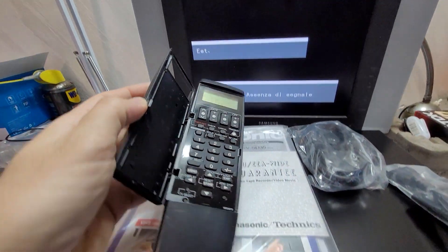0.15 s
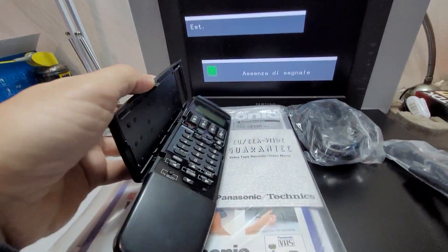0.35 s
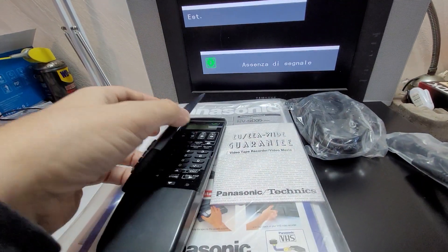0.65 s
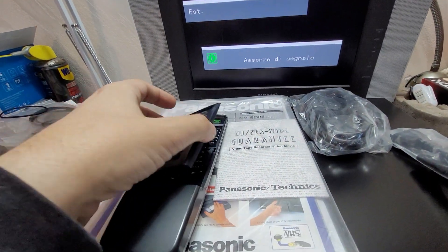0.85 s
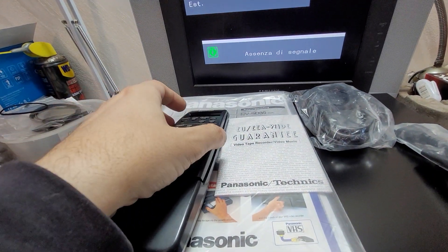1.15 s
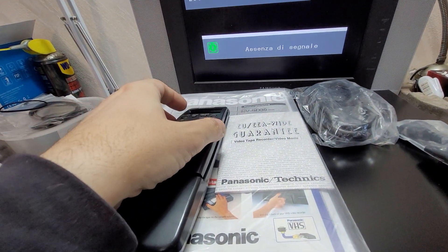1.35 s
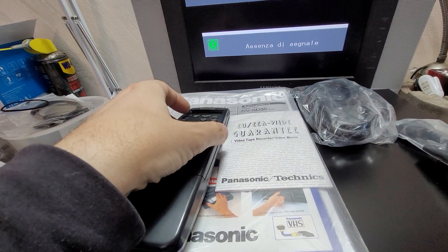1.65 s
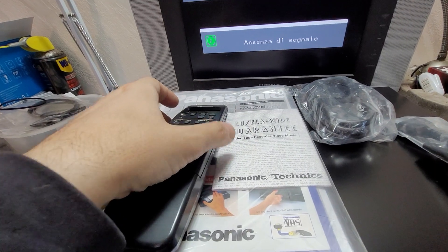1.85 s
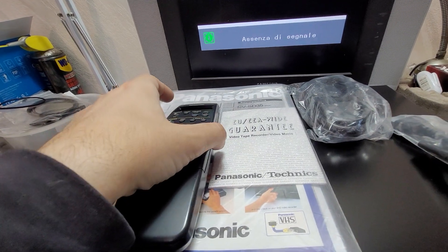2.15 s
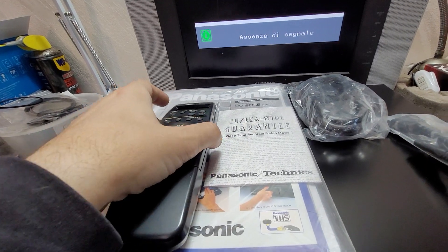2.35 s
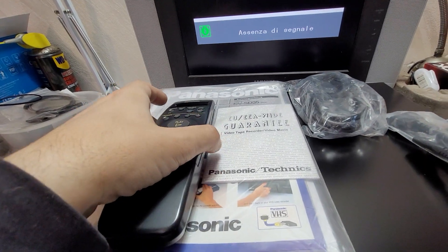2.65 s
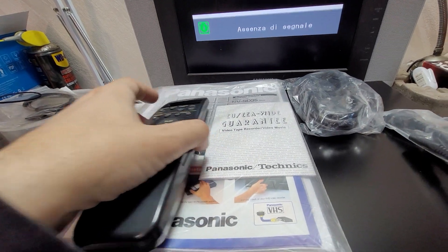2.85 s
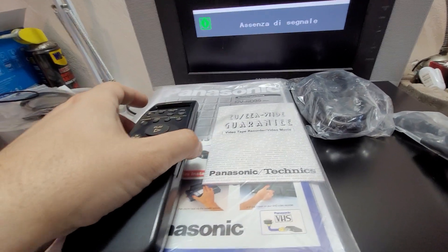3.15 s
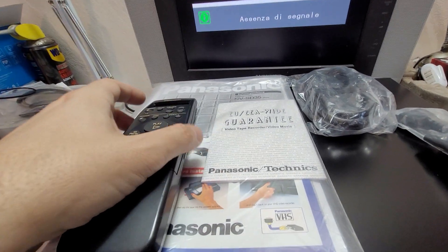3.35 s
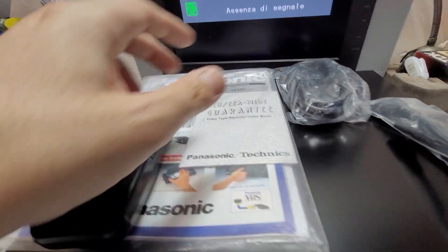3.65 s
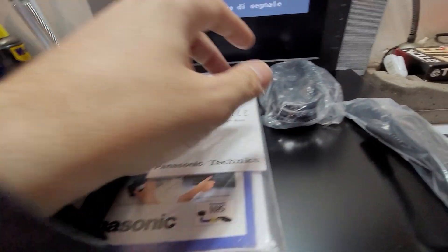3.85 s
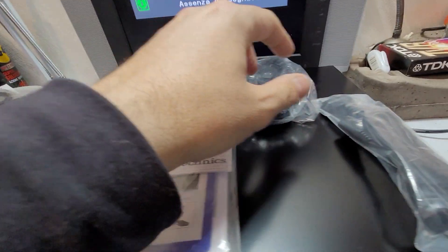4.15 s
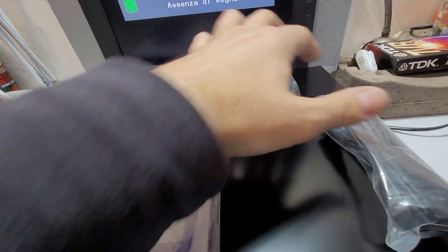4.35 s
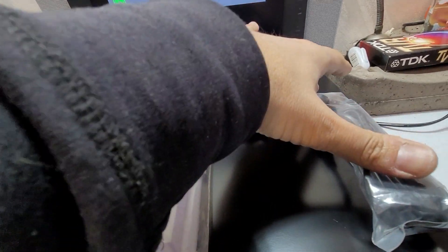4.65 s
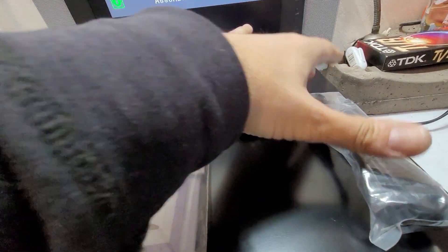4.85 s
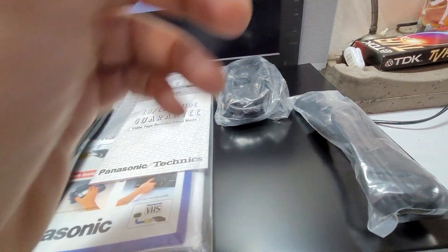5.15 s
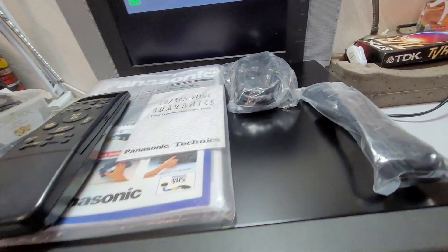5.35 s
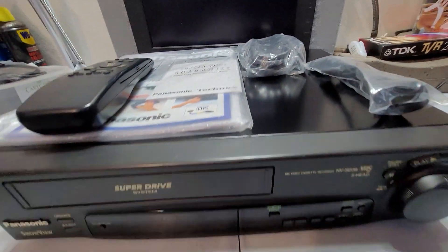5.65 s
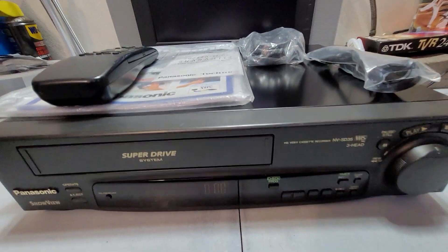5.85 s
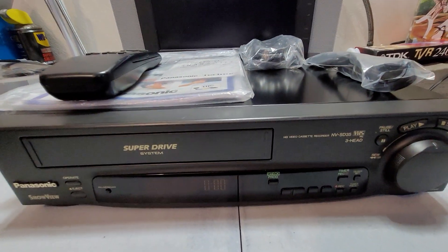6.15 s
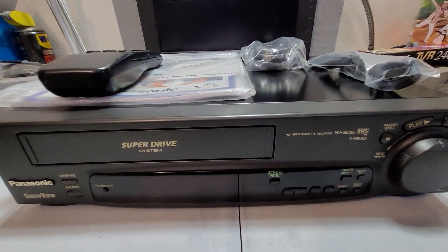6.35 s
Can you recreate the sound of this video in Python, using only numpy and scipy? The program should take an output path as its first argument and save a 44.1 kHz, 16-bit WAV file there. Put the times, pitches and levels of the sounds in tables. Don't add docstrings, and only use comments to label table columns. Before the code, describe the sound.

In a quiet small room with faint mains hum, a plastic remote's hinge creaks in quick slips. Cloth brushes and small ticks follow, then the lid bumps, ratchets down and snaps shut loudly, booming in the hollow desk. Later a thin bag crackles briefly. At the end a finger pops and rubs against the right port of the handheld phone.

```python
import sys
import numpy as np
from scipy import signal
from scipy.fft import rfft, irfft
from scipy.io import wavfile
from scipy.ndimage import uniform_filter1d

SR = 44100
rng = np.random.default_rng(int(sys.argv[2]) if len(sys.argv) > 2 else 0)


def attenuation_scalar(level_db):
    decades = np.asarray(level_db, float) / 20
    return 10 ** decades


def persist_wave(psi):
    counts = np.round(np.clip(psi, -1, 1) * 32767).astype(np.int16)
    wavfile.write(sys.argv[1], SR, np.atleast_2d(counts).T)


N = 287525
T = np.arange(N) / SR


def colour(x, points):
    size = 8192
    hz, db = np.transpose(points)
    grid_hz = np.arange(size // 2 + 1) * SR / size
    gain_db = np.interp(np.log(grid_hz + 1), np.log(hz), db)
    cep = irfft(gain_db * np.log(10) / 20)
    cep[1:size // 2] *= 2
    cep[size // 2 + 1:] = 0
    impulse = irfft(np.exp(rfft(cep)))
    return signal.oaconvolve(x, impulse[None], axes=-1)[:, :x.shape[1]]


def unit(x):
    return x / np.sqrt(np.mean(x ** 2))


def walk(rate_hz):
    hold = int(SR / rate_hz)
    steps = np.repeat(rng.standard_normal(N // hold + 1), hold)
    return 1.7 * uniform_filter1d(uniform_filter1d(steps, hold), hold)[:N]


def add(out, s, sound):
    i = int(s * SR)
    out[:, i:i + sound.shape[1]] += sound[:, :N - i]


def swells(rows, edge=3.):
    s, half, *db = np.transpose(rows)[:, :, None]
    coarse_t = T[::32]
    shape = np.exp(-np.abs((coarse_t - s) / half) ** edge)
    gains = [np.sqrt(np.sum((attenuation_scalar(d) * shape) ** 2, axis=0)) for d in db]
    return [np.interp(T, coarse_t, g) for g in gains]


def diffuse(x):
    ports_alike_hz = 604
    side = signal.lfilter(*signal.butter(2, ports_alike_hz, "high", fs=SR), x[1])
    return x[0] + side * np.array([[1], [-1]])


def ring(modes, t, scatter_db, turn):
    hz, db, t60 = np.transpose(modes)[:, :, None]
    level, phase = rng.standard_normal((2, 2, len(modes), 1))
    shape = (1 - np.exp(-1.5 * hz * t)) * 1000. ** (-t / t60)
    tones = np.sin(2 * np.pi * hz * t + turn * phase)
    y = (attenuation_scalar(db + scatter_db * level) * tones * shape).sum(axis=1)
    return y / np.abs(y).max()


# (from [Hz], to [Hz], level [dB], t60 [s])
ECHO_BANDS = [(0, 1500, -41, 0.25), (1520, 4000, -45.5, 0.38), (4000, 9600, -46.5, 0.43),
              (8300, 22050, -42, 0.26)]


def echo(sound, blur_hz):
    t = np.arange(2 ** 14) / SR
    hz = np.arange(len(t) // 2 + 1) * SR / len(t)
    power = np.mean(np.abs(rfft(sound, len(t))) ** 2, axis=0)
    smooth = np.sqrt(uniform_filter1d(power, int(blur_hz * len(t) / SR)).clip(0))
    noise = smooth * rfft(diffuse(rng.standard_normal((2, len(t)))))
    tail = 0
    for lo, hi, db, t60 in ECHO_BANDS:
        band = irfft(noise * (hz >= lo) * (hz < hi))
        tail = tail + attenuation_scalar(db) * band * 1000. ** (-t / t60)
    return tail * (1 - np.exp(-(t / 0.0031) ** 2))


# (frequency [Hz], level [dB])
TOP_MODES = [(9000, -3), (10200, 6.5), (11500, 4), (13000, -6), (14000, 1.5), (15000, -2), (15900, -0.5)]


def knocks(events, low, high, high_t60_s, pan_db, grip_db, dull_db=9.5, top=TOP_MODES):
    out, t = np.zeros((2, N)), np.arange(SR // 16) / SR
    top_t60_s = .002
    pan = attenuation_scalar(np.array([[.5], [-.5]]) * pan_db)
    for s, db, high_db, top_db, rattle_ms, free_hz in events:
        u = t * 2000 / max(rattle_ms, .2)
        contacts = rng.standard_normal(len(t)) * np.minimum(u * 6, 1) * np.exp(-u)
        contacts[2] += 2.5
        bins = rfft(contacts)
        flat = bins / (np.abs(bins) + 1e-9) ** .8
        contacts = irfft(flat, len(t)) * np.exp(-u / 4)

        low_free_hz, high_free_hz = min(free_hz, 1500), max(free_hz, 2600)
        low_set = [(hz, g - grip_db * np.log2(hz / low_free_hz) ** 2, t60) for hz, g, t60 in low]
        high_set = [(hz, g - dull_db * np.log2(hz / high_free_hz) ** 2, high_t60_s) for hz, g in high]
        top_set = [(hz, g, top_t60_s) for hz, g in top]
        sound = np.zeros((2, len(t)))
        for modes, turn, gain_db in ((low_set, .4, 0), (high_set, 1.1, high_db + 3.5),
                                     (top_set, 1.3, top_db + 16.5)):
            struck = ring(modes, t, 1.5, turn)
            part = signal.fftconvolve(contacts[None], struck)[:, :len(t)]
            sound += attenuation_scalar(db + gain_db) * part / np.abs(part).max()
        add(out, s + 0.00069, sound * pan)
        add(out, s, echo(sound, blur_hz=900))
    return out


def squeaks(rows, ports_db):
    out, t = np.zeros((2, N)), np.arange(-SR // 6, SR // 6) / SR
    for s, half, hz, width_hz, db in rows:
        noise = rng.standard_normal((2, 2, len(t)))
        wander = signal.lfilter(*signal.butter(2, width_hz / 2, fs=SR), noise)
        tone = unit(wander[0] * np.cos(2 * np.pi * hz * t) + wander[1] * np.sin(2 * np.pi * hz * t))
        tone[1] = 0.26 * tone[0] + 2.0 * tone[1]
        stroke = np.exp(-np.abs(t / half) ** 1.5)
        add(out, s + t[0], attenuation_scalar(db + np.array(ports_db)[:, None]) * tone * stroke)
    return out


# (multiple of 100.3 Hz [1], level [dB])
HUM_TONES = [(1, 0), (1.5, -16.5), (2, -14.5), (3, -14)]
# (time [s], level [dB])
HUM_LEVEL = [(0, -51), (.15, -52.5), (1.1, -53), (1.9, -54), (2.3, -53), (2.9, -52), (3.35, -52),
             (3.9, -50.5), (4.7, -53), (5.1, -55.5), (5.5, -51), (5.7, -57), (6.52, -55.5)]
# (centre [s], half length [s], level [dB])
STIRS = [(.38, 0.27, -52.5), (1.03, 0.12, -53.5), (1.47, 0.22, -50.5), (2.22, 0.17, -58),
         (2.9, 0.19, -51.5), (3.45, 0.15, -54.5), (3.8, 0.2, -53), (5.5, 0.19, -55.5), (5.95, .08, -58),
         (6.42, 0.03, -56)]
# (frequency [Hz], density [dB per Hz])
AIR = [(20, -15.5), (40, -1.5), (130, 0), (240, -0.5), (500, -13), (1000, -18.5), (1500, -27), (2500, -28),
       (8000, -33.5), (16000, -38.5)]


def room():
    hum_db = np.interp(T, *np.transpose(HUM_LEVEL)) + 0.51 * walk(3.9)
    hum = np.zeros(N)
    for multiple, db in HUM_TONES:
        flicker_db = 2.4 * walk(20)
        cycles = 100.3 * multiple * T + 0.007 * walk(17)
        hum += attenuation_scalar(db + flicker_db) * np.sin(2 * np.pi * cycles)
    mode_rest_db = -73.5
    stir = swells(STIRS, edge=1.9)[0] + attenuation_scalar(mode_rest_db)
    mode = np.sin(2 * np.pi * (56 * T + 0.57 * walk(0.7)))
    air_db = -57 + 0.5 * (T > 5.5) + 1.1 * walk(4)
    air = unit(colour(diffuse(rng.standard_normal((2, N))), AIR))
    return attenuation_scalar(hum_db + 2.5) * hum + stir * attenuation_scalar(4.5 + 1.5 * walk(9.6)) * mode + attenuation_scalar(air_db + 1.5) * air


# (centre [s], half length [s], coarse rustle [dB], fine rustle [dB])
CLOTH_STROKES = [(0.085, 0.043, -62, -79), (0.23, 0.07, -65.5, -76), (0.36, 0.057, -63, -77),
                 (0.443, 0.015, -59, -72), (0.564, 0.06, -63.5, -80), (0.646, 0.049, -67.5, -78),
                 (0.998, 0.076, -65, -88), (1.215, 0.069, -71, -99), (1.84, 0.14, -76, -83),
                 (2.051, 0.047, -67.5, -77.5), (2.408, .1, -68.5, -79), (2.684, 0.081, -69, -77),
                 (2.93, 0.09, -70.5, -68), (3.153, 0.075, -73, -95), (3.384, 0.048, -67, -69.5),
                 (3.426, 0.022, -66, -60.5), (3.67, 0.12, -65.5, -78.5), (4.157, 0.24, -70.5, -81.5),
                 (4.565, 0.043, -63.5, -66.5), (4.69, 0.076, -58.5, -83), (4.851, 0.014, -54, -89),
                 (5.003, 0.029, -93, -88), (5.341, 0.068, -69, -82), (5.51, 0.058, -65.5, -67)]
# (frequency [Hz], density [dB per Hz])
CLOTH_COARSE = [(1500, -20), (2500, -11), (3000, 0.5), (3600, -2), (4700, -1.5), (7000, -4.5), (9000, -13)]
# (frequency [Hz], density [dB per Hz])
CLOTH_FINE = [(3500, -16), (4400, -6), (4800, 1), (5400, -7), (6500, -14.5), (10500, 3), (13000, -3),
              (16000, -4)]


def cloth():
    coarse, fine = swells(CLOTH_STROKES, edge=1.4)
    coarse_rest_db, fine_rest_db = -74, -93
    coarse, fine = coarse + attenuation_scalar(coarse_rest_db), fine + attenuation_scalar(fine_rest_db)
    bursts_db = 1.7 * rng.standard_exponential((2, 1, N)).clip(max=6)
    grains = rng.standard_normal((2, 2, N)) * attenuation_scalar(bursts_db)
    fine = fine * attenuation_scalar(13.5 + 1.6 * walk(49)) * unit(colour(grains[0], CLOTH_FINE))
    return fine + coarse * attenuation_scalar(4.0 + 1.4 * walk(60)) * unit(colour(grains[1], CLOTH_COARSE))


# (time [s], low peak [dB], high [dB re low], top [dB re low], freest region [Hz])
CASE_TICKS = [(0.049, -47, 11.5, 2.5, 786), (0.382, -63, 5, 2, 6560), (0.392, -46.5, 4.5, -2.5, 708),
              (0.446, -50, -6, -24, 990), (0.679, -47.5, 9, -2, 3830), (0.787, -48, 11.5, -10, 5650),
              (0.818, -47, -29, -49, 1350), (1.813, -50, 6, -12, 2890), (2.004, -50, -5, -31.5, 1020),
              (1.737, -45, -6, -26, 1190), (1.787, -52, -9, -30, 1300), (1.801, -58, -2, -30, 1400),
              (2.232, -53.5, 2, -9, 3590), (2.286, -56, 1.5, -19, 1014), (2.304, -50.5, 5, -11.5, 4940),
              (2.372, -37.5, -6, -40, 1900), (2.438, -45.5, -0.5, -30, 5050), (2.75, -54.5, 3, -24, 904),
              (2.969, -48.5, 5, -18, 4000), (3.26, -60.5, 0, -29, 1660), (3.339, -51.5, -2, -27, 2600),
              (3.43, -59, 8, -8, 4760), (5.313, -41.5, -0.5, -29, 2610), (5.475, -48, 7.5, -3, 6400)]
# (frequency [Hz], level [dB], t60 [s])
CASE_LOW = [(740, -6, 0.024), (1035, 3.5, 0.011), (1305, -3, 0.014), (1550, 4.5, 0.0082),
            (1760, -1.5, 0.012), (2010, -1, 0.011)]
# (frequency [Hz], level [dB])
CASE_HIGH = [(2690, -2), (3050, -13), (3390, -1), (3990, -1), (4320, -2.5), (4800, -3.5), (5400, -1.5),
             (5900, -3), (6430, -10), (7310, -8.5)]


def case_ticks():
    rattle_ms = 4.2
    events = [(*tick, rattle_ms, free_hz) for *tick, free_hz in CASE_TICKS]
    return knocks(events, CASE_LOW, CASE_HIGH, .007, pan_db=-2.0, grip_db=6.5, dull_db=1.5)


# (time [s], low peak [dB], high [dB re low])
HINGE_SLIPS = [
    (0.0688, -33.5, -4.5),
    (.081, -34.5, -6),
    (.094, -36.5, -6),
    (.110, -37.5, -6.5),
    (.355, -41.5, -31),
    (.363, -43.5, -12),
]
# (frequency [Hz], level [dB], t60 [s])
HINGE_LOW = [(800, 9.5, 0.039), (851, 6.5, 0.037), (1350, 3, 0.017), (1630, -3, 0.015)]
# (frequency [Hz], level [dB])
HINGE_HIGH = [(2640, -10), (3080, -10), (3600, -11), (4200, -1), (4540, -3), (5000, -5), (5500, -8),
              (6060, -8), (6590, -7.5)]


def hinge():
    top_db, rattle_ms, free_hz = -40, 7.4, 4200
    events = [(*e, top_db, rattle_ms, free_hz) for e in HINGE_SLIPS]
    return knocks(events, HINGE_LOW, HINGE_HIGH, 0.016, pan_db=-2.5, grip_db=8)


# (time [s], peak [dB], deep panel [dB re upper panels])
DESK_BLOWS = [
    (0.499, -59, 18),
    (1.027, -40.5, 3),
    (1.5775, -20, 2.5),
    (1.623, -39.5, -15.5),
    (4.133, -54.5, 12),
    (4.847, -39, -3),
]
# (frequency [Hz], level [dB], t60 [s])
DESK_DEEP = [(55, -5, .2), (68, -3, 0.09), (87, -1.5, 0.36), (104.7, 1.5, 0.36)]
# (frequency [Hz], level [dB], t60 [s])
DESK_UPPER = [(172, -9.5, 0.46), (237, -6, 0.12), (275, -4.5, 0.11), (330, -4, .11), (385, 2.5, 0.055),
              (618, -11, 0.06)]


def desk():
    out, t = np.zeros((2, N)), np.arange(SR // 2) / SR
    upper_lead_s, palm_s = .008, 0.083
    palm = 1 - 0.93 / (1 + np.exp((palm_s - t) / .008))
    for s, db, deep_db in DESK_BLOWS:
        deep = ring(DESK_DEEP, t, scatter_db=1.4, turn=.1) * (1 - np.exp(-t / 0.0012)) * palm
        upper = ring(DESK_UPPER, t, scatter_db=1.0, turn=.1) * (1 - np.exp(-t / 0.005))
        add(out, s - upper_lead_s, attenuation_scalar(db) * upper)
        add(out, s, attenuation_scalar(db + deep_db) * deep)
    return out


# (centre [s], half length [s], frequency [Hz], width [Hz], level [dB])
CASE_SQUEAKS = [(1.425, .025, 3400, 250, -77), (2.225, .007, 3550, 500, -69), (2.236, .007, 5950, 700, -69),
                (2.234, .008, 4600, 1200, -67), (2.336, .012, 1300, 500, -69),
                (2.388, .013, 2500, 200, -65), (2.391, .003, 1300, 350, -61),
                (2.355, .014, 4400, 1200, -66), (2.96, .02, 4700, 350, -67), (2.972, .006, 1350, 300, -60),
                (3.236, .006, 1700, 700, -68), (3.41, .04, 4800, 450, -64), (3.437, .012, 3850, 450, -66),
                (4.172, .007, 1850, 220, -65), (4.172, .007, 3400, 300, -68), (.93, .06, 1500, 900, -69),
                (.79, .004, 1950, 350, -58), (2.235, .008, 7100, 400, -69)]


def case_squeaks():
    return squeaks(CASE_SQUEAKS, (0.3, 0.3))


# (time [s], low peak [dB], high [dB re low], top [dB re low], rattle [ms])
BUMPS = [
    (1.021, -24, 0.5, -22, 2.1),
    (1.0232, -30, 8.5, -10.5, 3.9),
    (1.026, -34, 1, -20, 10.6),
]
# (frequency [Hz], level [dB], t60 [s])
BUMP_LOW = [(790, -3, 0.01), (950, -6, 0.024), (1500, -10, 0.01), (1780, -10, 0.018)]
# (frequency [Hz], level [dB])
BUMP_HIGH = [(2550, -2.5), (2800, -2), (3380, -4), (3950, -5), (4230, 1), (4900, -1.5), (5580, -9),
             (6610, -9.5)]


def lid_bump():
    free_hz = 880
    events = [(*e, free_hz) for e in BUMPS]
    return knocks(events, BUMP_LOW, BUMP_HIGH, 0.0083, pan_db=-6.0, grip_db=1.5, dull_db=0.5)


# (time [s], peak [dB], share of ring time [1])
RINGS = [
    (1.026, -49, .5),
    (1.57, -30, .9),
]
# (frequency [Hz], level [dB], t60 [s])
RING_MODES = [(991, -1, 0.16), (1480, -16, .2), (1820, -9.5, .28), (2143, -9, .3), (2420, -7.5, .18),
              (2960, -5.5, 0.37), (3079, -11, .35), (3390, -6.5, .15), (3526, -5, .2), (4100, -6.5, 0.3),
              (4450, -11, .3), (4960, -11.5, .3), (5420, -12, .3), (5717, -13.5, .3)]


def ringing():
    out, t = np.zeros((2, N)), np.arange(SR // 2) / SR
    for s, db, share in RINGS:
        for pair_hz in (0, 23):
            modes = [(hz + pair_hz * rng.standard_normal(), g, t60 * share) for hz, g, t60 in RING_MODES]
            tones = ring(modes, t, scatter_db=2.5, turn=1.5)
            add(out, s, attenuation_scalar(db) * tones * (1 - np.exp(-t / .004)))
    return out


# (time [s], peak [dB], high [dB re low])
RATCHET_TEETH = [
    (1.3415, -29, -5),
    (1.465, -44.5, -12),
    (1.481, -37, -9.5),
    (1.510, -34.5, -8.5),
    (1.533, -28.5, -10),
    (1.554, -36, -16),
]
# (frequency [Hz], level [dB], t60 [s])
RATCHET_LOW = [(900, 0, 0.011), (1190, 1.5, .01), (1660, 2.5, 0.008), (2130, 1.5, .008)]
# (frequency [Hz], level [dB])
RATCHET_HIGH = [(2590, -1.5), (2940, 0), (3400, -10), (3840, -7), (4450, -8), (5280, -17.5)]


def lid_ratchet():
    top_db, rattle_ms, free_hz = -55, 1.4, 1400.5
    events = [(*e, top_db, rattle_ms, free_hz) for e in RATCHET_TEETH]
    return knocks(events, RATCHET_LOW, RATCHET_HIGH, .006, pan_db=-1.0, grip_db=1.6, dull_db=3)


# (time [s], low peak [dB], high [dB re low], top [dB re low], rattle [ms])
LATCH = [
    (1.559, -12.5, -15, -40, 1.4),
    (1.5609, -20, 1.5, -28.5, 4.3),
    (1.5645, -20, 1.5, -22, 3.4),
    (1.5673, -4, 1.5, -14, 0.76),
    (1.5684, -13.5, 8.5, -2.5, 1.7),
    (1.5705, -15, 8, -9, 2.6),
]
# (frequency [Hz], level [dB], t60 [s])
LID_LOW = [(760, -3, .012), (1030, 0.5, 0.013), (1270, 4.5, 0.014), (1500, -10, .008), (1810, -4.5, 0.016),
           (2090, -6.5, 0.011)]
# (frequency [Hz], level [dB])
LID_HIGH = [(2960, -4), (3400, 4.5), (4000, 3.5), (4320, -1.5), (4750, -0.5), (5330, 2), (5900, -5.5),
            (6420, 5.5), (6880, -2.5), (7300, 1.5)]
# (frequency [Hz], level [dB])
LID_TOP = [(9900, 6), (11200, -3), (12400, -4.5), (13500, 4), (14100, 4.5), (15100, 5), (15700, 0)]


def lid_latch():
    free_hz = 1207
    events = [(*e, free_hz) for e in LATCH]
    return knocks(events, LID_LOW, LID_HIGH, 0.0064, pan_db=2.0, grip_db=0.6, dull_db=2.5, top=LID_TOP)


# (time [s], low peak [dB], high [dB re low], top [dB re low], rattle [ms])
BAG_CREASES = [(4.5866, -31, 6, -9.5, 2.9), (4.603, -40, 1.5, -27, 1.6), (4.652, -40.5, 5, -24, 3.4),
               (4.664, -54, 3, 6, 1.8), (4.672, -55, 6, 4, 1.3), (4.678, -50, -5, -10, 1.2),
               (4.695, -52, 8.5, 9.5, 2.4), (4.735, -62.5, 32, 24, 3.2), (4.741, -65, 27.5, 24, 2.4),
               (4.767, -60.5, 17, -2, 1.4), (4.8414, -33, 3, -20, 3.6), (4.863, -41.5, 2.5, -18, 3.5)]
# (frequency [Hz], level [dB], t60 [s])
THIN_LOW = [(698, -1, 0.006), (1078, -2, 0.012), (1506, 0.5, 0.0084), (1780, -4, 0.012)]
# (frequency [Hz], level [dB])
THIN_HIGH = [(2600, 11), (3400, 11.5), (4100, 8.5), (4600, 9.5), (5200, 9), (5900, 7.5), (6600, -24),
             (7500, -14)]
THIN_T60_S = .004


def bag():
    free_hz = 3950
    events = [(*e, free_hz) for e in BAG_CREASES]
    return knocks(events, THIN_LOW, THIN_HIGH, THIN_T60_S, pan_db=-8.0, grip_db=-4.0)


# (centre [s], half length [s], frequency [Hz], width [Hz], level [dB])
PORT_SQUEAKS = [(5.39, .065, 6500, 900, -61), (5.51, .055, 5800, 1300, -60), (5.668, .016, 6500, 2200, -60),
                (5.87, .08, 6300, 1800, -64), (5.49, .07, 11500, 2500, -67), (5.88, .1, 11300, 2200, -63),
                (5.41, .012, 400, 400, -55)]


def port_squeaks():
    return squeaks(PORT_SQUEAKS, (-12, 0.3))


# (centre [s], half length [s], port rumble [dB], skin hiss [dB], hiss at left port [dB])
FINGER_STROKES = [(5.44, 0.1, -74, -62, -67), (5.582, 0.015, -52, -45, -47), (5.592, 0.0081, -35, -55, -48),
                  (5.66, 0.058, -63, -61.5, -63), (5.875, 0.029, -55.5, -71, -81),
                  (5.954, 0.015, -49.5, -57, -56), (6.105, 0.036, -48, -72, -72),
                  (6.134, 0.018, -38, -45.5, -58), (6.156, .011, -48, -64, -68),
                  (6.315, 0.024, -37, -50, -52), (6.192, 0.023, -37.5, -44.5, -62),
                  (6.23, 0.049, -39, -49.5, -70), (6.28, 0.065, -39, -48.5, -59),
                  (6.341, 0.022, -32, -38, -54), (6.366, 0.019, -35.5, -41.5, -56),
                  (6.382, 0.033, -41, -62, -45.5), (6.49, 0.018, -47.5, -59, -57),
                  (6.0, 0.015, -54, -62.5, -71), (6.05, 0.0061, -55, -84.5, -63)]
# (frequency [Hz], density [dB per Hz])
RUB_PORT = [(60, -4.5), (300, 1), (600, 4.5), (1300, -3), (2200, -9), (5000, -21.5)]
# (frequency [Hz], density [dB per Hz])
RUB_PRESSED = [(300, -18), (700, -3), (1000, 0.5), (1500, -5.5), (2300, -14), (4000, -26)]
# (frequency [Hz], density [dB per Hz])
RUB_SKIN = [(1200, -11), (2500, 1), (6000, 5), (8000, 1), (10000, -44)]
# (frequency [Hz], density [dB per Hz])
RUB_FINE = [(6000, -29), (8500, 3), (11500, 8), (16000, -5)]


def finger_strokes():
    rest_from_s, pressed_at_db = 5.5, -31
    resting = T > rest_from_s
    rests_db = (-72.5, -71, -70.5, -72)
    *rest, fine_rest = [attenuation_scalar(db + 2.5 * walk(22)) * resting for db in rests_db]
    rumble, hiss, left = np.hypot(swells(FINGER_STROKES, edge=1.36), rest)
    sheen = np.hypot(hiss * attenuation_scalar(-8.5), fine_rest)
    bursts_db = 2.3 * rng.standard_exponential((3, N)).clip(max=4.5) + 1.2 * walk(250)
    grains = rng.standard_normal((3, N)) * attenuation_scalar(bursts_db)
    skin = unit(colour(grains[1:], RUB_SKIN))
    fine = unit(colour(grains[1:], RUB_FINE))
    out = skin * [left, hiss * attenuation_scalar(5.5)] + fine * [left * attenuation_scalar(-10), sheen * attenuation_scalar(17)]
    out[1] += rumble * attenuation_scalar(5.5) * unit(colour(grains[:1], RUB_PORT))[0]
    out[1] += rumble ** 2 * attenuation_scalar(5.5 - pressed_at_db) * unit(colour(grains[1:2], RUB_PRESSED))[0]
    return out


# (time [s], low peak [dB], high [dB re low], top [dB re low], rattle [ms])
SHELL_TAP = [
    (5.574, -33, 3, -3, 0.69),
]


def finger_tap():
    free_hz = 1500
    events = [(*e, free_hz) for e in SHELL_TAP]
    return knocks(events, THIN_LOW, THIN_HIGH, THIN_T60_S, pan_db=-11.5, grip_db=-2.0)


# (time [s], pressure peak [dB], push [ms], grit [dB re peak])
PORT_POPS = [(5.575, -23, 0.19, -11), (5.5915, -12.5, 0.097, -0.5), (5.648, -34.5, 0.53, -16),
             (5.951, -33, 0.66, -15), (5.593, -1, 0.294, -18), (5.685, -13.5, 0.36, -15),
             (5.717, -16, 0.3, -15), (5.828, -25.5, 0.16, -5), (5.873, -35, 0.57, -22),
             (6.02, -37, 1.2, -22), (6.064, -21, 0.4, -14.5), (5.618, -40, 1.8, -30),
             (5.627, -39, 1.6, -29), (6.116, -35, 0.36, -11), (6.123, -26.5, 0.49, -10),
             (6.171, -24, .3, -6)]


def finger_pops():
    out, t = np.zeros((2, N)), np.arange(-SR // 200, SR // 30) / SR
    grit_shape = np.exp(-np.abs(t - .0008) / np.where(t < .0008, .0006, .0022))
    ports = attenuation_scalar(np.array([[-42], [0]]))
    for s, db, push_ms, grit_db in PORT_POPS:
        u = t * 1000 / push_ms
        push = np.exp(-u ** 2)
        overshoot = 0.8 * np.exp(-((u - 2.3) / 1.4) ** 2)
        leak = 0.36 * np.tanh((u - 3.5).clip(0) / 3.9) * np.cos(u / 13) * np.exp(-u.clip(0) / 32)
        grit = attenuation_scalar(grit_db) * uniform_filter1d(rng.standard_normal(len(t)), size=2) * grit_shape
        add(out, s + t[0], attenuation_scalar(db) * (push - overshoot + leak + grit) * ports)
    return out


# (frequency [Hz], level [dB re right port])
LEFT_PORT = [(100, 1.5), (400, -0.5), (1300, 0.5), (2400, -2.5), (4400, -11), (8000, -6), (15000, -14)]


def scene():
    airborne = room() + cloth() + case_ticks() + hinge() + desk() + case_squeaks()
    airborne += lid_bump() + ringing() + lid_ratchet() + lid_latch() + bag() + finger_tap()
    airborne[:1] = colour(airborne[:1], LEFT_PORT)
    return airborne + port_squeaks() + finger_strokes() + finger_pops()


def low_pass(x):
    return signal.sosfilt(signal.butter(12, 17150, fs=SR, output="sos"), x)


# (frequency [Hz], level [dB])
MIC = [(20, -13), (45, -2), (7000, 4.5), (7900, 0.5), (8800, -19), (9600, -8.5), (15800, -8), (16450, -50)]


def record(dry):
    mix = np.tanh(colour(dry, MIC) / 1.206)
    return low_pass(mix)


dry = scene()
out = record(dry)
persist_wave(out)
```